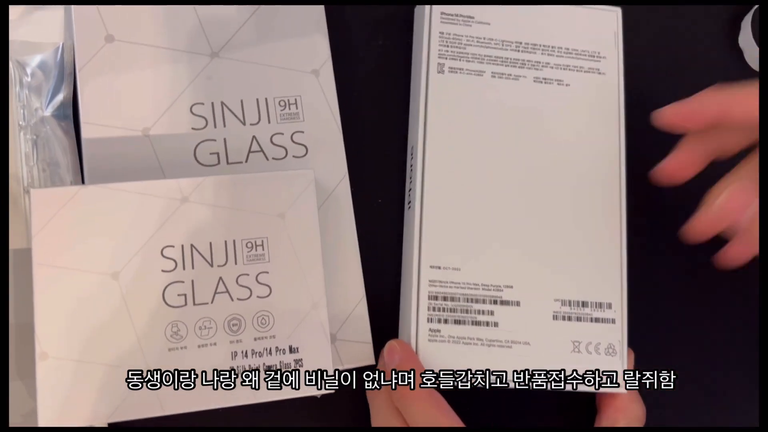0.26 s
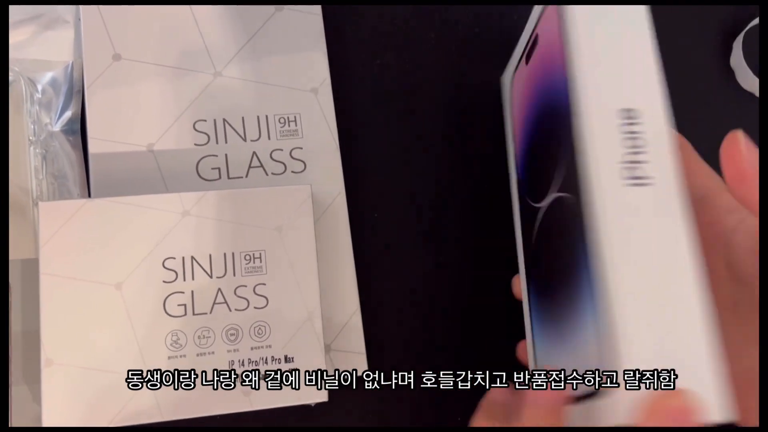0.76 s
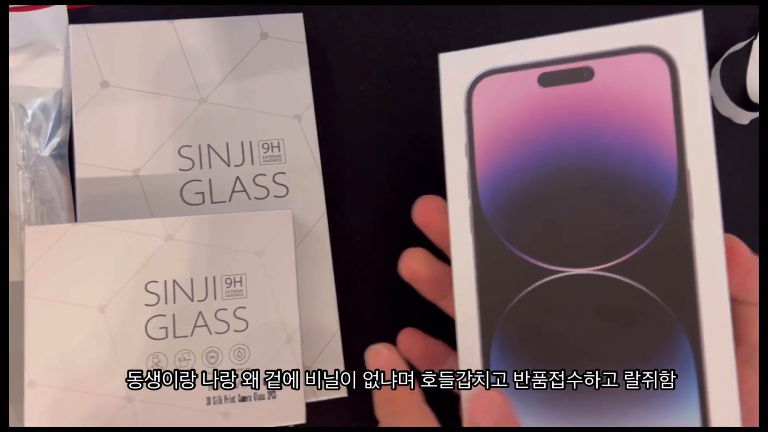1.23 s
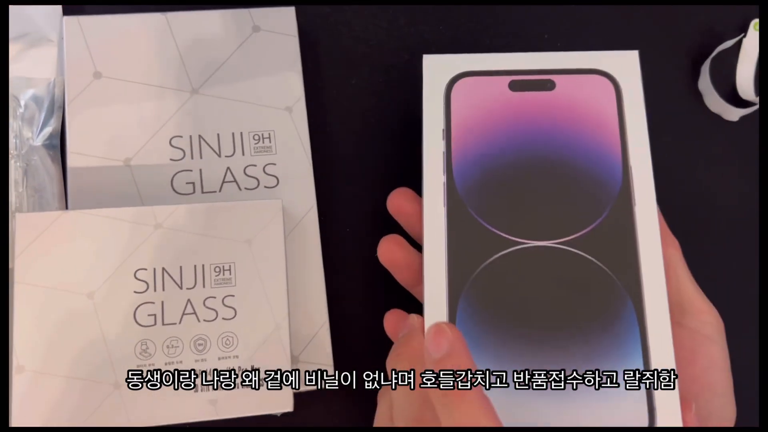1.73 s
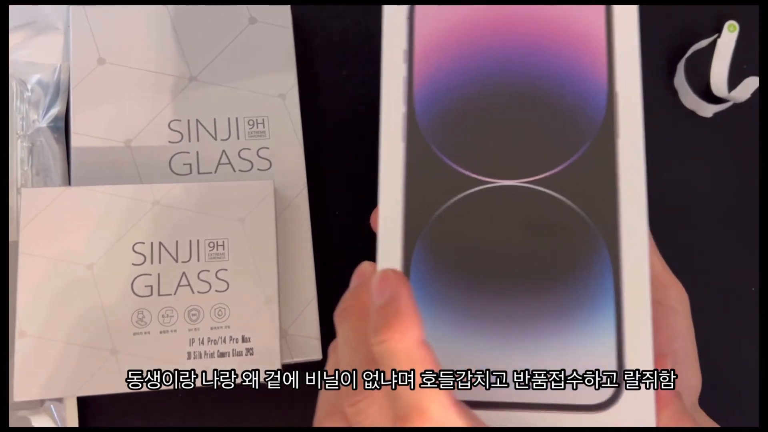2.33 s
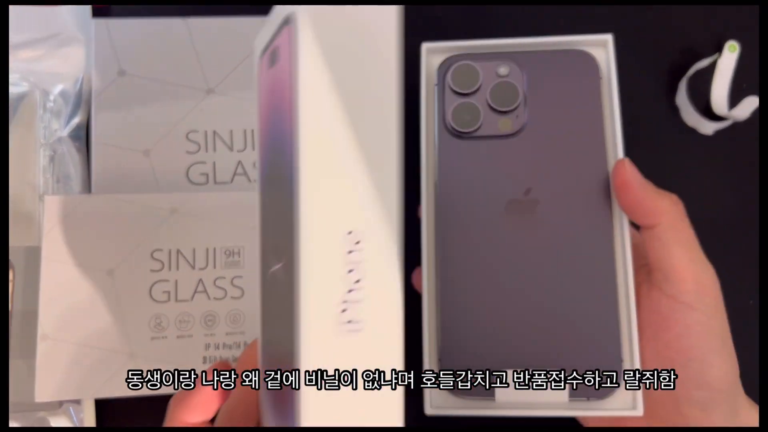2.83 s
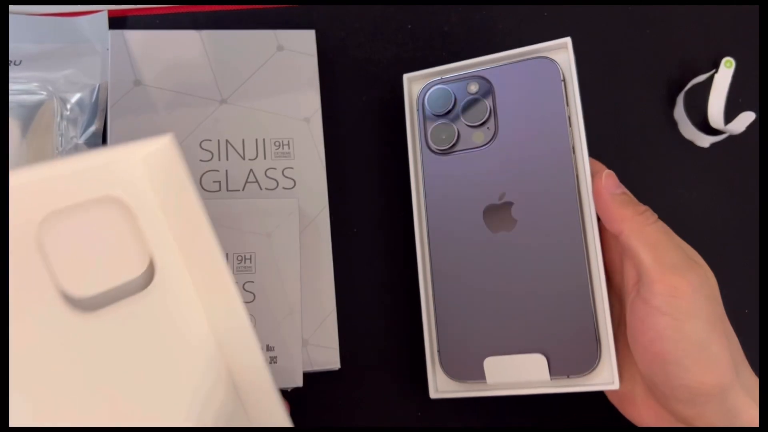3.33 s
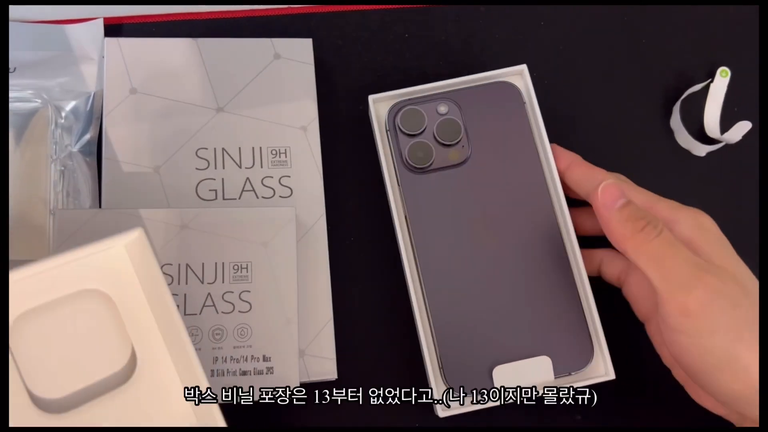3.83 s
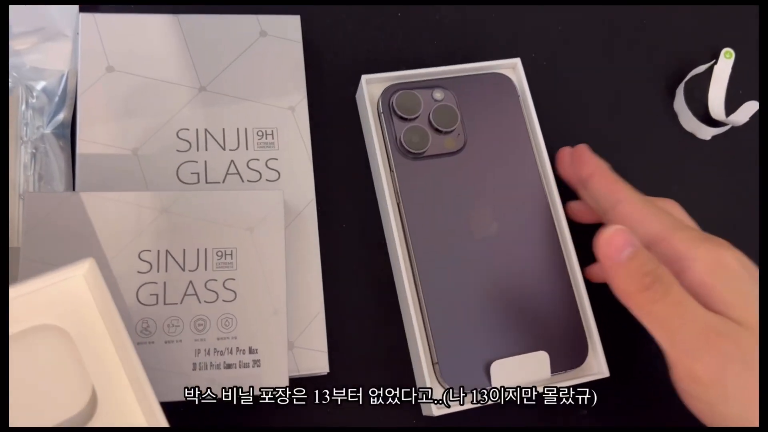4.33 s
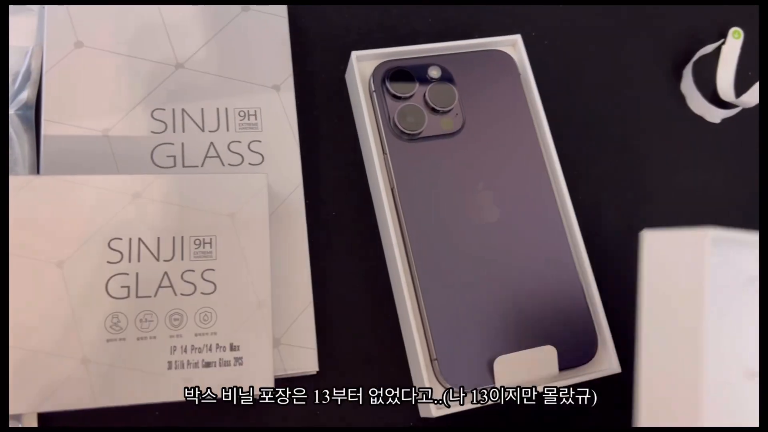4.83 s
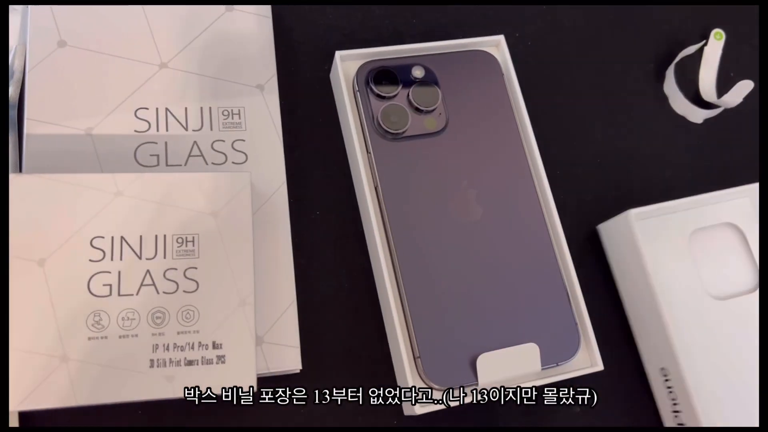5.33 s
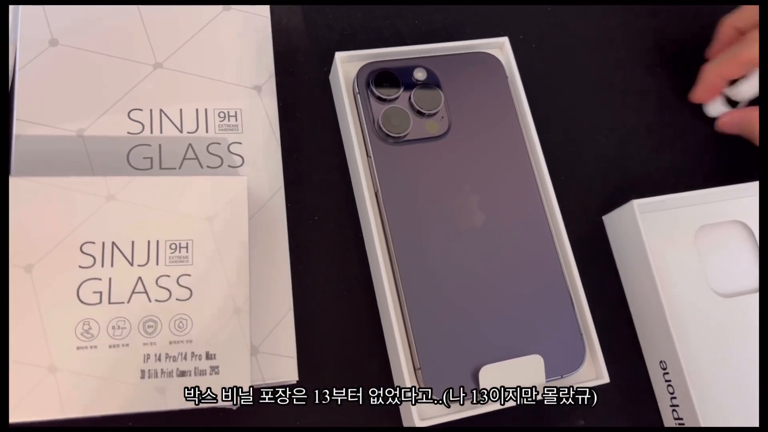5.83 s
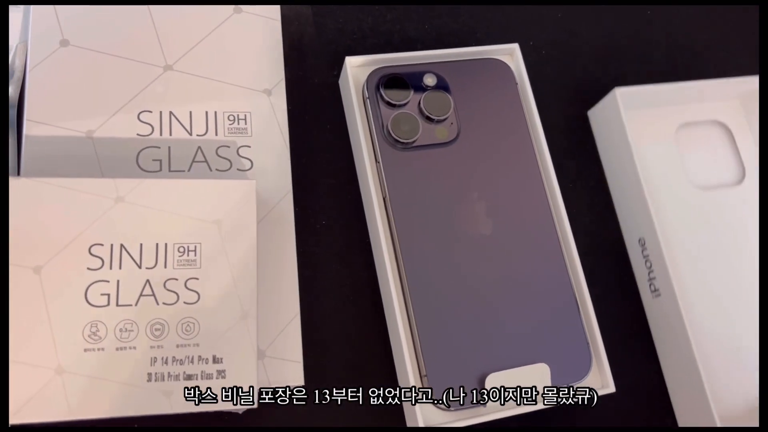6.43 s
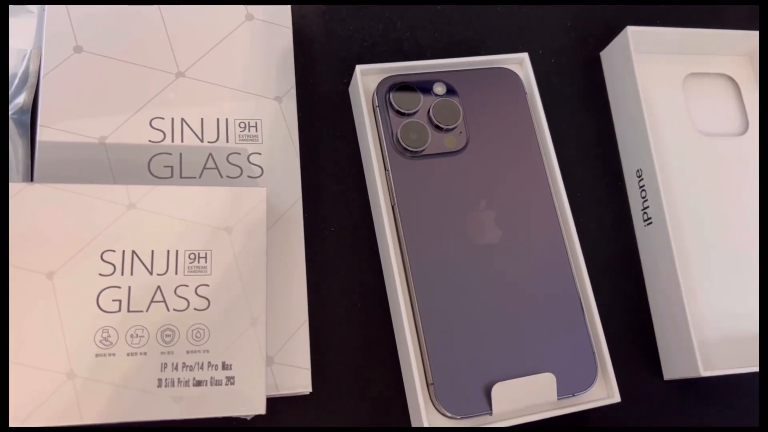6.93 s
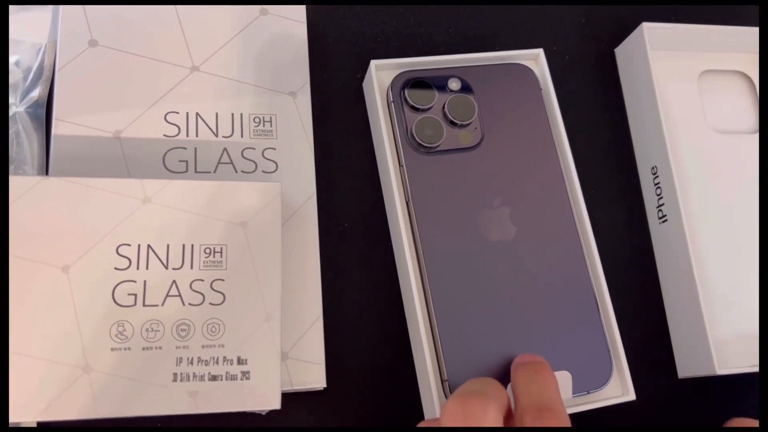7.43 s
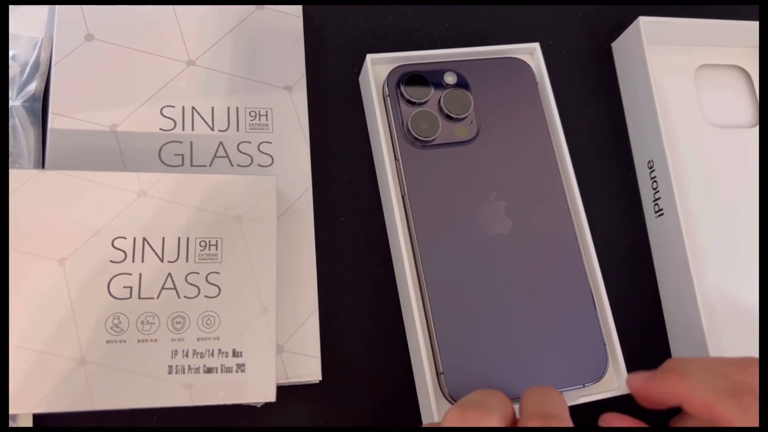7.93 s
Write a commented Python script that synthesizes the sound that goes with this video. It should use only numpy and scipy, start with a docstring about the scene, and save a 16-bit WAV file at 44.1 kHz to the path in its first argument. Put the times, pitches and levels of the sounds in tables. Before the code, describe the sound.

A quiet small room with faint bassy tone and a low table murmur from leaning hands, miked very close on the tabletop. At 0.3 s a cardboard box taps down with a crisp tick and soft boom, followed by dry rubbing and bright skin scuffs until 0.9 s. Light brushes lead to the lid being drawn off at 1.6-2.1 s, a dull papery rub with a faint narrow squeak, ending in a small tick and scuff. Soft bumps pass near 2.4 and 2.9 s. At 3.4 s a low thump, then a dragged edge hums deeply to 4 s. The heaviest, knocking thud lands at 4.2 s. Bumps and rubs cluster at 5.05-5.35 s. A bright hollow rap rings the empty lid at 5.9 s, then it slides over cloth with a steady hiss until 6.8 s. Near quiet follows, with tiny clicks and touches from 7.8 to 8.2 s.

```python
"""A small cardboard box and its lid are handled on a cloth-covered table in a quiet room; the microphone is on it too.
Room tone and the murmur of leaning hands come first, then rubbing: shaped noise, dull for card, bright for skin.
From 0.3 s corners and nails tick (short noise bursts), landings boom (fading table tones) and quick scuffs hiss.
Near 1.6 s the lid sings as it is drawn off (narrow noise); near 3.6 s its edge makes the table hum.
The heaviest landing is at 4.2 s, a knuckle rings the lid at 5.9 s, the lid then slides, and small touches end it."""
import sys
import numpy as np
from scipy import signal
from scipy.fft import rfft, irfft, next_fast_len
from scipy.io import wavfile
from scipy.ndimage import uniform_filter1d, map_coordinates

SR = 44100
rng = np.random.default_rng(int(sys.argv[2]) if len(sys.argv) > 2 else 0)


def dump(signal):
    """Clip the signal to [-1, 1] and save it as 16-bit WAV at the path in sys.argv[1]."""
    limited = np.clip(np.atleast_2d(signal).T, -1, 1)
    pcm = np.round(limited * 32767).astype(np.int16)
    wavfile.write(sys.argv[1], SR, pcm)


def voltage_ratio(decibels):
    """Convert decibels (scalar or array-like) to amplitude ratios, 20 dB per decade."""
    exponent = np.asarray(decibels, float) / 20
    return 10 ** exponent


N = 360297  # length in samples


def rms_one(x):
    """Scales a sound to an rms (average strength) of 1."""
    return x / np.sqrt(np.mean(x ** 2) + 1e-20)


def peak_one(x):
    """Scales a sound so that its largest swing is 1."""
    return x / abs(x).max()


def along(points, hz):
    """Reads a curve of (f/Hz, value) points on a logarithmic frequency axis."""
    f, value = np.transpose(points)
    return np.interp(np.log(hz + 1), np.log(f + 1), value)


def over_time(points):
    """Draws straight lines through (t/s, value) points, giving one value per sample."""
    t, value = np.transpose(points)
    return np.interp(np.arange(N) / SR, t, value)


def wobble(rate):
    """Joins random values by straight lines, rate values a second."""
    knots = rng.standard_normal(int(N * rate / SR) + 4)
    return map_coordinates(knots, [np.arange(N) * rate / SR], order=1)


def filtered(x, response):
    """Shapes a sound by a complex response, a function of frequency in Hz."""
    size = next_fast_len(x.shape[-1] + 8192)
    spectrum = rfft(x, size) * response(np.fft.rfftfreq(size, 1 / SR))
    return irfft(spectrum, size)[..., :x.shape[-1]]


def resonance(f, centre_hz, width_hz):
    """One resonance, with gain 1 at its centre."""
    return 1j * f * width_hz / (centre_hz ** 2 - f * f + 1j * f * width_hz)


def hollow(f):
    """The hollow card box: its resonances colour a direct part that is equal at all frequencies."""
    # resonances of the box: (f/Hz, width/Hz, level/dB before the 4 dB lift below)
    box_modes = [(810, 110, -17), (1220, 110, -2), (1523, 36, -14), (1930, 59, -4.5), (2317, 43, -17.5),
                 (3230, 150, -20.5), (4014, 67, -20.5), (5623, 150, -3), (7860, 710, -7)]
    response = 0.67
    for k, (centre_hz, width_hz, db) in enumerate(box_modes):
        response = response + (-1) ** k * voltage_ratio(db + 4) * resonance(f, centre_hz, width_hz)
    return response


def add(out, start, db, sound):
    """Places a sound of peak 1 at start seconds and level db, leaning a little to a random side."""
    lean_db = 0.4 * rng.standard_normal()
    out[:, round(start * SR):][:, :len(sound)] += voltage_ratio(db) * sound * voltage_ratio([[lean_db], [-lean_db]])


def stroke(start, strongest, end):
    """A stroke's swell from 0 to 1 and back; times in seconds."""
    # an end ahead of the strongest moment cuts the swell off there; an end ahead of the start gives silence
    ramp = np.interp(np.arange(N) / SR, [start, strongest, end], [0, 1, 0])
    return np.sin(np.pi / 2 * ramp) ** 1.05


def strokes(rows):
    """Adds up the power of many strokes, in a main layer and a brighter layer that swells more steeply."""
    power = np.zeros((2, N))
    for start, strongest, end, db, bright_db in rows:
        swell = stroke(start, strongest, end)
        power[0] += (voltage_ratio(db) * swell) ** 2
        power[1] += (voltage_ratio(db + bright_db) * swell ** 1.55) ** 2
    return power


def rush(spectrum, grain_db, streak_db):
    """Stereo noise of rms 1: quick level changes make it gritty, slower ones make single bands come and go."""
    # how alike left and right are: (f/Hz, likeness from 0 to 1)
    likeness = [(100, 1), (300, 0.34), (800, 0.31), (4000, 1), (12000, 0.6)]
    gritty = rng.standard_normal((2, N)) * voltage_ratio(grain_db * wobble(320))
    z = signal.stft(gritty, nperseg=256)[2]
    field = uniform_filter1d(rng.standard_normal(z.shape[1:]), size=2, axis=0)
    field = uniform_filter1d(field, size=24, axis=1)
    pair = signal.istft(z * voltage_ratio(streak_db * rms_one(field)), nperseg=256)[1][:, :N]

    def mid_and_side(hz):
        turn = np.arccos(np.clip(along(likeness, hz), -1, 1)) / 2
        return voltage_ratio(along(spectrum, hz)) * [np.cos(turn), np.sin(turn)]

    mid, side = filtered(pair, mid_and_side)
    return rms_one(np.array([mid + side, mid - side]))


def room_tone():
    """The quiet room: steady noise, strongest in the bass."""
    # colour of the room tone: (f/Hz, relative level per Hz/dB)
    tone_colour = [(15, -62.5), (25, -9.5), (43, -3), (64, -1.5), (185, -22), (229, -16), (354, -22),
                   (394, -26.5), (591, -22), (659, -26), (962, -36), (2050, -46), (4490, -55), (7110, -48),
                   (16000, -80)]
    return voltage_ratio(-60.5) * rush(tone_colour, grain_db=-1.5, streak_db=-1.16)


def shaking():
    """Hands leaning on the table: small shifts of weight keep its lowest resonances murmuring."""
    # how strongly the table murmurs: (t/s, level/dB before the wobble)
    lean_level = [(0.0, -65.5), (0.48, -54), (1.05, -57.5), (1.36, -54.5), (1.77, -62.5), (3.3, -60),
                  (3.41, -53), (3.46, -48.5), (4.03, -64), (4.23, -53), (4.82, -61), (5.05, -72),
                  (5.12, -52), (5.3, -52.5), (5.66, -55.5), (6.17, -67.5), (6.46, -60.5), (6.64, -66.5),
                  (7.94, -70), (8.17, -55.5)]
    low_modes = [(60.3, 6.6, 9.5), (127, 9.5, -9), (206, 26, -23)]  # (f/Hz, width/Hz, relative level/dB)
    modes = lambda f: sum(voltage_ratio(db) * resonance(f, centre_hz, width_hz) for centre_hz, width_hz, db in low_modes)
    murmur = rms_one(filtered(rng.standard_normal(N), modes))
    return voltage_ratio(over_time(lean_level) + 4.2 * wobble(27)) * murmur


def rubbing():
    """Card on card rubs dull, skin and cloth on card hiss: noise in four layers with never quite even strokes."""
    # card on card or cloth: (start t/s, strongest t/s, end t/s, dull level/dB, rasp level over it/dB)
    card_strokes = [(.07, .12, 0.82, -72.5, -6.5), (.3, .375, .55, -61.5, -3), (.44, .7, 0.875, -66, -3.5),
                    (.81, .86, 0.93, -67, 0.5), (.96, 1.08, 1.15, -70.5, -11),
                    (1.19, 1.257, 1.43, -66, -20), (1.38, 1.45, 1.72, -63, -26),
                    (1.56, 1.64, 1.68, -61, -19), (1.62, 1.97, 2.15, -56.5, -5),
                    (2.36, 2.55, 2.71, -67.5, -11.5), (2.62, 2.82, 4.3, -72.5, -19),
                    (2.88, 2.95, 2.97, -69, -11), (3.1, 3.2, 3.45, -75, -12), (3.3, 3.45, 3.7, -64, -7),
                    (3.56, 3.66, 3.85, -62, -2.5), (3.79, 3.85, 4.09, -64, -12.5),
                    (4.12, 4.19, 4.28, -72, -8.5), (4.21, 4.24, 4.4, -59, -11), (4.45, 4.63, 4.9, -68, -8),
                    (4.86, 5.03, 5.3, -78, -2), (5.08, 5.135, 5.21, -68, 0.5), (5.21, 5.26, 5.57, -66, -9),
                    (5.35, 5.46, 5.38, -72, 8), (5.49, 5.54, 5.55, -62.5, -33), (5.67, 5.79, 6.23, -65, -6),
                    (5.88, 6, 6.19, -63, -7.5), (6.37, 6.46, 6.74, -69, -1), (6.54, 6.61, 6.69, -65, -8.5),
                    (6.74, 6.86, 7, -81, -25.5), (7.25, 7.55, 7.6, -77.5, -13),
                    (7.92, 7.946, 8, -72.5, -23), (8.03, 8.08, 7.9, -71.5, -21)]
    # skin on card: (start t/s, strongest t/s, end t/s, hiss level/dB, sheen level over it/dB)
    skin_strokes = [(.07, .12, 0.33, -84, -3), (.27, .375, 0.52, -63.5, -8.5), (.46, .75, 0.89, -70.5, -11),
                    (.79, .875, .95, -65.5, -7), (.98, 1.07, 1.16, -81.5, -7.5),
                    (1.21, 1.26, 1.31, -72.5, -17), (1.38, 1.42, 1.4, -69, -14),
                    (1.692, 1.7, 1.74, -65, -7), (1.78, 2.05, 2.15, -72.5, -25),
                    (2.35, 2.43, 2.7, -75.5, -12), (2.88, 2.954, 3.1, -81.5, -5),
                    (3.08, 3.2, 3.34, -84, -4), (3.39, 3.44, 3.66, -68.5, -6), (3.44, 3.53, 3.64, -68, -21),
                    (3.57, 3.69, 3.78, -63, -16), (3.78, 3.96, 4.02, -82.5, -4), (4.1, 4.18, 4.3, -80, -8),
                    (4.22, 4.28, 3.7, -76, -18), (4.6, 4.7, 4.84, -74, -15), (4.88, 5.03, 5.07, -79, -2.5),
                    (5.07, 5.16, 5.34, -70.5, -15), (5.22, 5.25, 4.67, -65, -10),
                    (5.31, 5.45, 5.55, -66, -17), (5.62, 5.64, 5.06, -81, -1), (5.7, 5.77, 5.9, -66, -9),
                    (5.88, 5.96, 6.03, -62.5, -17), (7.45, 7.57, 7.8, -90.5, -8),
                    (7.92, 7.946, 7.8, -86, -15), (8.04, 8.076, 7.7, -92, 2)]
    # the lid's long slide over the cloth: (t/s, hiss level/dB)
    lid_slide = [(5.99, -110), (6.03, -58), (6.2, -61), (6.3, -58.5), (6.5, -61.5), (6.6, -59),
                 (6.7, -61.5), (6.75, -84), (6.8, -110)]
    # colours of the four layers, from dull to brightest: (f/Hz, relative level per Hz/dB)
    dull_colour = [(180, -31.5), (300, -2.5), (500, 5.5), (850, -2), (1200, -1.5), (1600, -4.5),
                   (2300, -5.5), (3000, -23), (4200, -47.5)]
    rasp_colour = [(1900, -15), (2700, -4.5), (3300, -5.5), (4300, -9), (5600, -9), (6800, -33)]
    hiss_colour = [(2470, -40.5), (4200, -18), (4620, -5), (5430, 0.5), (5860, -0.5), (7410, 3.5),
                   (10500, -1.5), (13600, -31.5), (22000, -120)]
    sheen_colour = [(8800, -35), (10200, 0.5), (11500, 1.5), (12600, -0.5), (15300, -3), (16000, -27.5)]

    # dull, rasp, hiss and sheen of the slide, in dB over its hiss
    slide = voltage_ratio(over_time(lid_slide) + np.array([[-15.5], [-10], [0], [-6]]))
    stroke_power = np.vstack([strokes(card_strokes), strokes(skin_strokes)])
    dull_gain, rasp_gain, hiss_gain, sheen_gain = np.sqrt(stroke_power + slide ** 2)

    dull = rms_one(filtered(rush(dull_colour, grain_db=2.0, streak_db=4.0), hollow))
    rasp = rms_one(filtered(rush(rasp_colour, grain_db=-0.2, streak_db=3.0), hollow))
    hiss = rush(hiss_colour, grain_db=1.0, streak_db=0.0)
    sheen = rush(sheen_colour, grain_db=-0.3, streak_db=0.74)

    uneven = wobble(27)  # shared by all layers, in dB once scaled
    return (dull_gain * voltage_ratio(0.67 * uneven) * dull + rasp_gain * voltage_ratio(0.8 * uneven) * rasp
            + hiss_gain * voltage_ratio(1.6 * uneven) * hiss + sheen_gain * voltage_ratio(0.6 * uneven) * sheen)


def ticks():
    """Corners and nails on card: a crack and weaker rattle, in a low and a high region set by the spot struck."""
    # ticks: (t/s, peak level/dB, low centre f/Hz, treble level over it/dB, treble centre f/Hz)
    # the peak level is that of the low part alone
    tick_list = [(0.295, -40.5, 1340, -1.5, 7100), (0.311, -37.5, 1060, -4.5, 3580),
                 (0.314, -28, 390, -40, 3660), (0.417, -56, 1600, 3, 4960), (0.849, -49.5, 821, -9, 3950),
                 (0.98, -52.5, 740, -17, 3970), (1.189, -58, 1780, 9, 8200), (1.213, -52, 1280, -22, 4070),
                 (1.254, -56, 2100, -22, 5940), (1.404, -50.5, 1500, -15, 4050),
                 (2.038, -46, 1170, 0.5, 4150), (2.754, -56, 1120, -22, 3740),
                 (3.325, -50.5, 960, -27, 3920), (3.394, -45.5, 655, 4, 7900),
                 (3.41, -43.5, 610, -27, 3900), (3.817, -44, 1078, -35, 5100), (4.216, -18, 822, -11, 7700),
                 (4.598, -51, 792, -24, 4000), (4.692, -47.5, 2520, -24, 3760),
                 (5.06, -41, 1770, -2.5, 8140), (5.111, -47, 1000, -10, 3940),
                 (5.216, -45.5, 1400, -2, 4150), (5.267, -27, 770, -6, 3750), (5.29, -47, 1900, -15, 3690),
                 (5.524, -47.5, 743, -33, 3600), (5.748, -53.5, 2250, 4, 7400),
                 (5.775, -50.5, 1500, 5.5, 5087), (5.866, -23.5, 1680, 7, 6360),
                 (6.042, -42, 708, -3, 7210), (6.101, -48.5, 886, 9, 8150), (7.003, -65.5, 1530, -18, 3690),
                 (7.844, -48.5, 1249, -3, 3110), (7.874, -51, 1510, -4, 3020),
                 (7.939, -62.5, 1900, -11.5, 3655), (8.081, -65.5, 2000, -7.5, 5900),
                 (8.158, -57, 985, -25, 3600)]
    out, t = np.zeros((2, N + SR)), np.arange(SR // 4) / SR
    t60 = np.array([[0.0144], [0.0081]])  # seconds to fall by 60 dB: low crack, treble crack
    fade = voltage_ratio(-60 * t / t60) + 0.09 * voltage_ratio(-60 * t / (7 * t60))  # crack + rattle
    onset = 1 - np.exp(-t / 0.00016)
    for start, db, low_hz, treble_db, high_hz in tick_list:
        burst = rng.standard_normal((2, len(t))) * fade * onset
        low = filtered(burst[0], lambda f: hollow(f) * resonance(f, low_hz, 0.95 * low_hz) ** 2)
        high = filtered(burst[1], lambda f: hollow(f) * resonance(f, high_hz, 1.3 * high_hz) ** 2
                        / (1 + 1j * f / 13000) ** 2)
        add(out, start, db, peak_one(low) + voltage_ratio(treble_db) * peak_one(high))
    return out[:, :N]


def thumps():
    """Each landing rings the table top: its tones swell and fade, more slowly at first if contact is longer."""
    # landings: (t/s, deep boom level/dB, body level over it/dB, knock level over it/dB, contact time/s)
    # these levels add to the levels of the single tones below
    landings = [(0.314, -28.5, 0, -15.5, 0.0061), (0.779, -45, -45, -22, 0.0015),
                (0.848, -48, -17, -4, 0.003), (1.4, -63.5, 19, 11, 0.0021), (2.039, -52.5, -7, 1, 0.00082),
                (2.364, -46.5, -3, -43, 0.013), (2.938, -42, -7, -29, 0.005),
                (3.231, -38, -34.5, -40, 0.0041), (3.288, -39, -21.5, -25, 0.0031),
                (3.333, -45.5, -30, -24.5, 0.0032), (3.399, -24, 5.5, -30, 0.0079),
                (4.215, -18, 12.5, 1, 0.0046), (4.261, -26, -4.5, -8.5, 0.0034),
                (4.627, -45.5, -2.5, -11.5, 0.0063), (5.058, -26.5, 3, -8.5, 0.0072),
                (5.111, -29, 2, -7.5, 0.0097), (5.141, -30, -13, -21, 0.0065),
                (5.21, -35, -16, -25.5, 0.003), (5.265, -28.5, -2, 4.5, 0.0015),
                (5.299, -25.5, -11.5, -10.5, 0.0063), (5.347, -26.5, -10, -20, 0.0007),
                (5.521, -52, -4.5, 8.5, 0.012), (5.868, -49, 14, 10.5, 0.012),
                (6.043, -59, 22.5, 19.5, 0.012), (8.028, -61, 5, 0, 0.002)]
    # tones of the table top: (f/Hz, relative level/dB, time to fall by 60 dB/s)
    table_tones = [(57, -9, 0.19), (68.66, 7, 0.34), (78, -9.5, 0.19), (112, -6, 0.22), (111, 6.5, 0.11),
                   (125.8, -0.5, 0.22), (137, -31, 1.4), (174, -4.5, 0.17), (212.3, 1.5, 0.16),
                   (258.6, 0, .18), (318.7, -2, 0.12), (389.5, -1, 0.1), (421.5, -3.5, 0.081),
                   (486, 4, 0.056), (626, -7.5, 0.072), (821, -1, 0.024), (1060, -7.5, 0.048),
                   (1240, -9.5, 0.019)]
    out, t = np.zeros(N + SR), np.arange(SR) / SR
    hz, mode_db, t60 = np.transpose(table_tones)[:, :, None]
    group = np.searchsorted([90, 170, 480], hz)  # deep, body, knock, highest tones
    for start, deep_db, body_db, knock_db, contact in landings:
        # a heavier landing is flatter, so it excites the highest tones less
        highest_db = knock_db - 6 - 0.24 * (deep_db + 39.5)
        level = deep_db + mode_db + np.array([0, body_db, knock_db, highest_db])[group]
        level = level + 0.7 * rng.standard_normal(hz.shape)
        swell = (1 - np.exp(-t * np.sqrt(hz / 100) / contact)) ** 2
        tones = voltage_ratio(level - 60 * t / t60) * swell * np.sin(2 * np.pi * hz * t)
        out[round(start * SR):][:SR] += tones.sum(axis=0)

    def board(f):
        # bending waves: high frequencies arrive first, the delay falls as one over root frequency
        spread = np.exp(-2j * np.pi * 0.16 * (np.sqrt(f) - f / 80))  # f / 80 takes 2 ms off every delay
        return spread * (1j * f / (45 + 1j * f)) ** 2  # weakens the bass below about 45 Hz

    return filtered(out[:N], board)


def room(x):
    """The room's answer: a noise tail in which each frequency dies at its own speed."""
    # how long the room rings: (f/Hz, time to fall by 60 dB/s)
    ring_time = [(200, 0.22), (2000, 0.34), (10000, .15)]
    hz, t, z = signal.stft(rng.standard_normal((2, SR // 2)), SR, nperseg=256)
    fade = voltage_ratio(-60 * t / along(ring_time, hz)[:, None])
    tail = signal.istft(z * fade, SR, nperseg=256)[1]
    delayed = np.pad(x, (150, 0))[None]  # 3.4 ms
    return signal.fftconvolve(delayed, tail / np.linalg.norm(tail[0]), axes=1)[:, :N]


def scuffs():
    """Skin or a card edge scuffs briefly: gritty noise that swells and fades."""
    # scuffs: (t/s, peak level/dB, centre f/Hz, low part level over it/dB, length/s)
    # the peak level is that of the high part alone
    scuff_list = [(0.368, -48, 6740, -26, 0.027), (0.766, -51, 9700, -7, 0.06),
                  (0.882, -35, 8200, -7.5, 0.03), (0.893, -31.5, 10900, -9, 0.013),
                  (1.257, -62.5, 3070, 10.5, 0.034), (1.3926, -55, 4600, 4.5, 0.11),
                  (1.6933, -50.5, 6300, -1, 0.033), (2.065, -37, 4540, -34, 0.055),
                  (2.419, -61.5, 6100, 0, 0.044), (2.946, -66, 6440, 2, 0.07),
                  (3.428, -51.5, 3100, -26, 0.037), (3.637, -50.5, 3020, 0, 0.084),
                  (3.745, -57.5, 2580, 14.5, 0.018), (5.885, -37, 3256, -1, 0.05)]
    out, t = np.zeros((2, N + SR)), np.arange(SR // 4) / SR
    for start, db, centre_hz, low_db, length in scuff_list:
        u = t / (0.32 * length)
        grit = voltage_ratio(3.7 * rng.standard_normal(len(t) // 64 + 1).repeat(64)[:len(t)])
        burst = rng.standard_normal((2, len(t))) * grit * np.sqrt(u) * np.exp(-u * u)
        high = filtered(burst[0], lambda f: hollow(f) * resonance(f, centre_hz, 0.94 * centre_hz) ** 2
                        / (1 + 1j * f / 12000) ** 2)
        low = filtered(burst[1], lambda f: hollow(f) * resonance(f, 1500, 2300) ** 2)
        add(out, start, db, peak_one(high) + voltage_ratio(low_db) * peak_one(low))
    return out[:, :N]


def singing_lid():
    """The lid sings faintly while drawn off the tray, later while it slides: noise in one narrow band."""
    # songs: (start t/s, strongest t/s, end t/s, level/dB before the wobble, f/Hz)
    songs = [(1.597, 1.64, 1.77, -63.5, 1133), (1.751, 1.936, 2.106, -61, 1204),
             (6.406, 6.46, 6.68, -70, 2780)]
    out = np.zeros(N)
    for start, strongest, end, db, hz in songs:
        band = rms_one(filtered(rng.standard_normal(N), lambda f: resonance(f, hz, 0.1 * hz) ** 2))
        out += voltage_ratio(db + 2.5 * wobble(18)) * stroke(start, strongest, end) * band
    return out


def hum():
    """The lid's edge drags and makes one low table resonance hum: a rough tone made of narrow noise."""
    # one hum: (start t/s, strongest t/s, end t/s, level/dB, f/Hz, width/Hz)
    drag = (3.56, 3.72, 4.08, -54.5, 135, 22)
    start, strongest, end, db, hz, width_hz = drag
    tone = rms_one(filtered(rng.standard_normal(N), lambda f: resonance(f, hz, width_hz) ** 2))
    return voltage_ratio(db) * stroke(start, strongest, end) * tone


def knocked_lid():
    """A knuckle catches the empty lid: its tones fade, each with an unsteady level."""
    # knocks: (t/s, peak level/dB)
    knocks = [(5.8654, -31)]
    # tones of the lid: (f/Hz, relative level/dB, time to fall by 60 dB/s)
    lid_tones = [(1413, -1, .2), (1530, -3, .2), (1900, -4, .1), (2293, -14, .1), (3250, -10, .1),
                 (3940, -12, .1), (5432, -13, .1)]
    out, t = np.zeros((2, N + SR)), np.arange(SR // 2) / SR
    for start, db in knocks:
        ring = np.zeros(len(t))
        for hz, level, t60 in lid_tones:
            flutter = voltage_ratio(4.5 * wobble(81)[:len(t)])  # the lid rocks, so no tone rings purely
            ring += flutter * voltage_ratio(level - 60 * t / t60) * np.sin(2 * np.pi * hz * t)
        add(out, start, db, peak_one(ring))
    return out[:, :N]


def scene():
    """Table, card and hands in the room."""
    card = ticks() + scuffs() + singing_lid() + knocked_lid()
    table = thumps()
    answer = room(voltage_ratio(-10.0) * card.mean(axis=0) + voltage_ratio(-30.0) * table)
    return room_tone() + shaking() + rubbing() + card + table + answer + hum()


def microphone(dry):
    """Two ports hear the sound out of step; the deepest bass and the very top are weakened."""
    # timing of the two ports: (f/Hz, phase by which left leads/radians)
    port_lead = [(500, 0), (1400, -0.47), (10000, -0.4), (15000, 0.92)]

    def response(f):
        ports = np.exp(0.5j * along(port_lead, f) * [[1], [-1]])
        return ports * (1j * f / (30 + 1j * f)) ** 2 * np.where(f < 15900, 1, 0.1)

    return filtered(dry, response)


def roll_off(x):
    """The treble ends steeply here."""
    return signal.sosfilt(signal.butter(12, 16820, fs=SR, output="sos"), x)


def record(dry):
    """Turns the sound in the room into the finished stereo sound."""
    mix = microphone(dry)
    return roll_off(mix)


dry = scene()
out = record(dry)
dump(out)
```